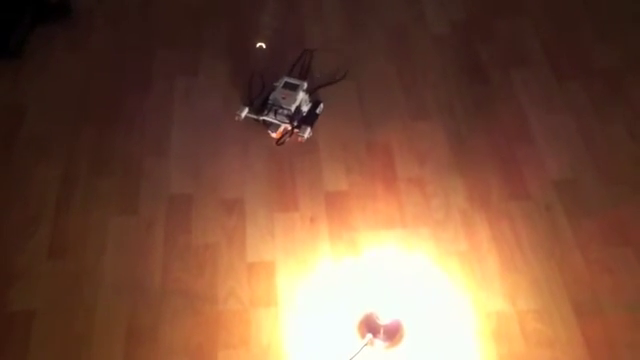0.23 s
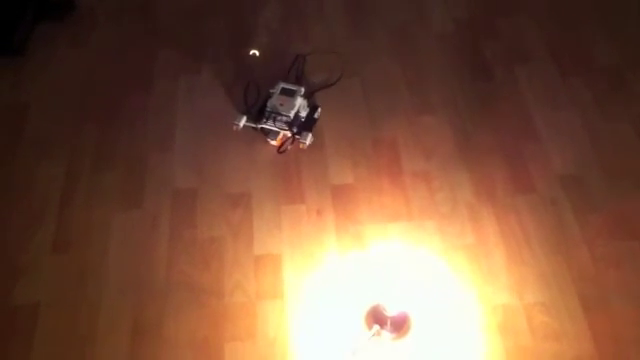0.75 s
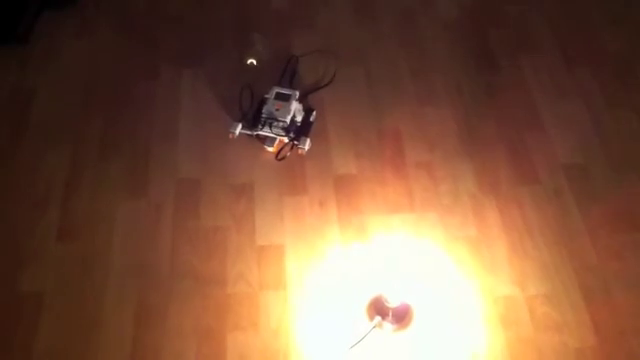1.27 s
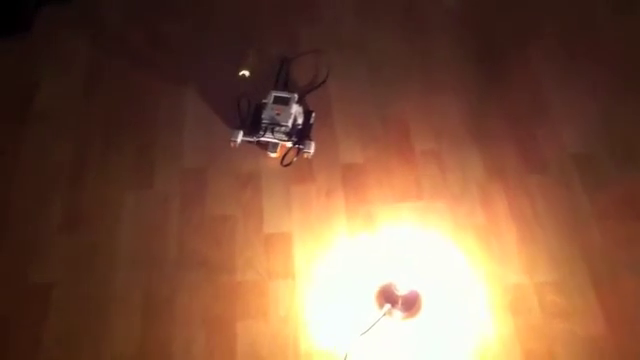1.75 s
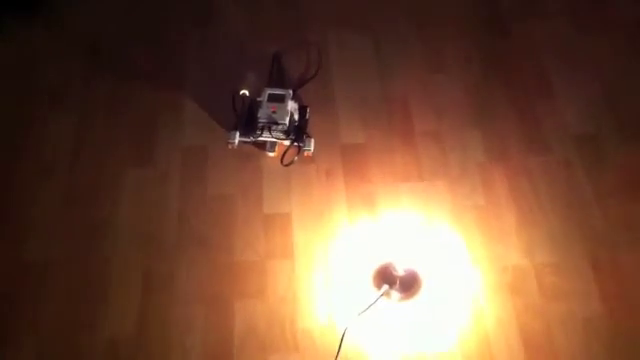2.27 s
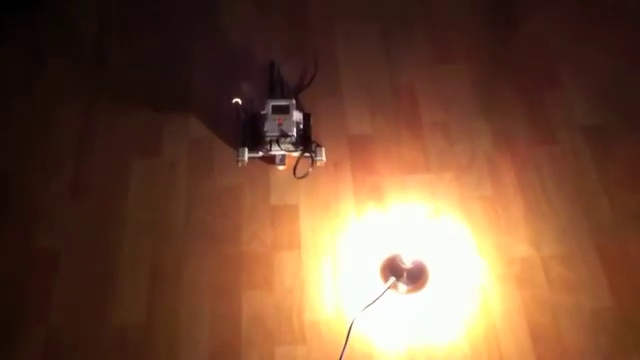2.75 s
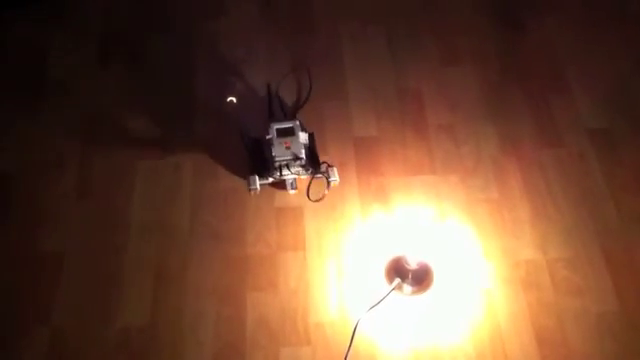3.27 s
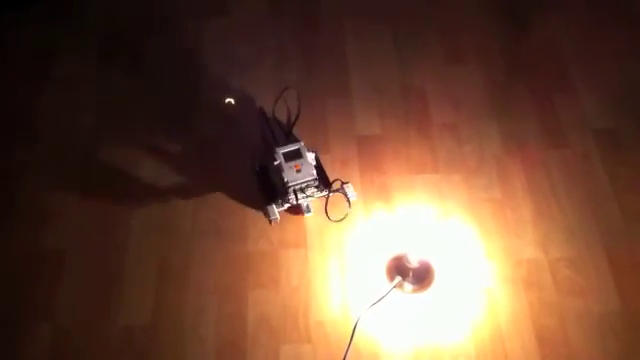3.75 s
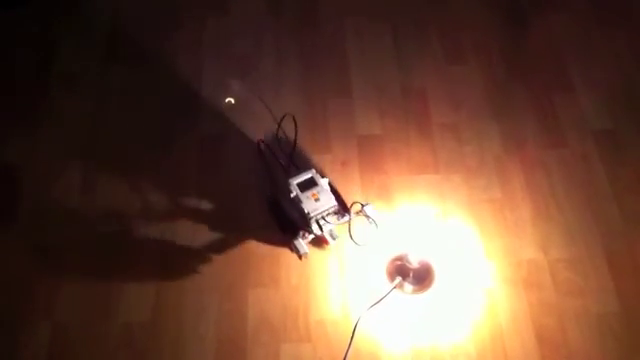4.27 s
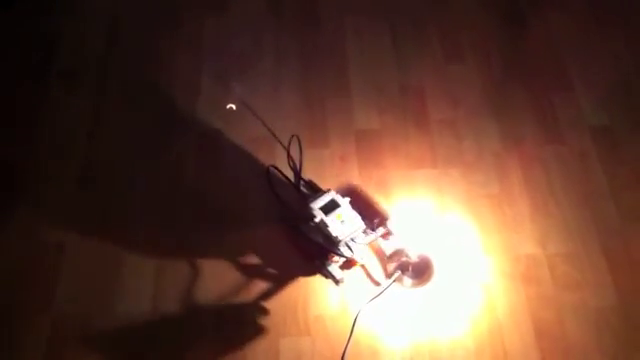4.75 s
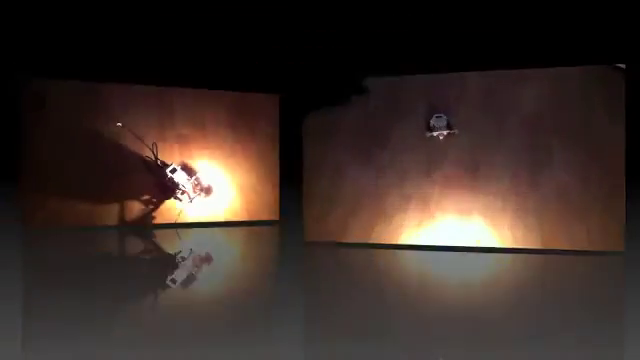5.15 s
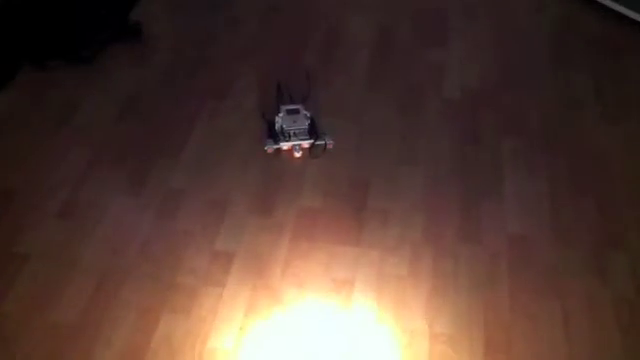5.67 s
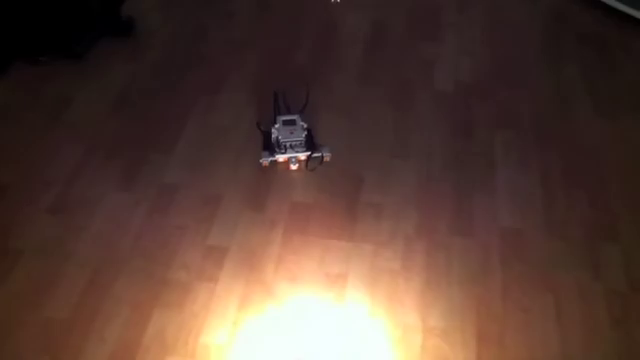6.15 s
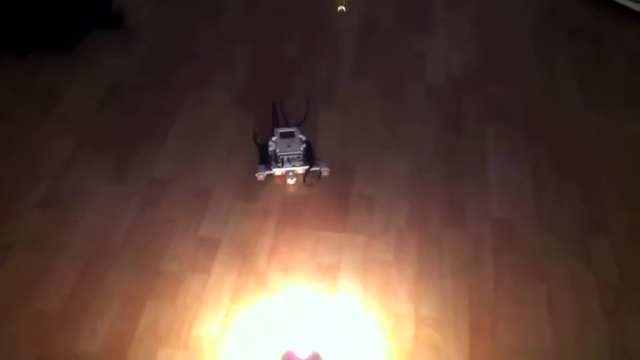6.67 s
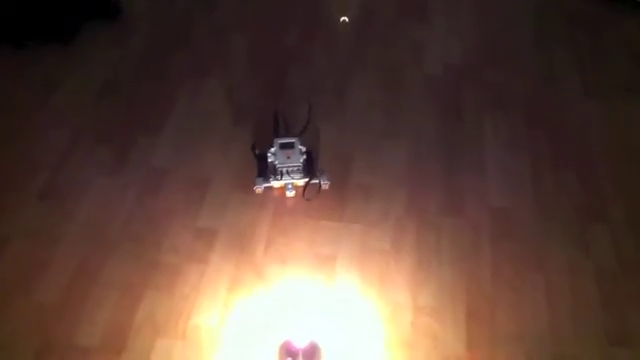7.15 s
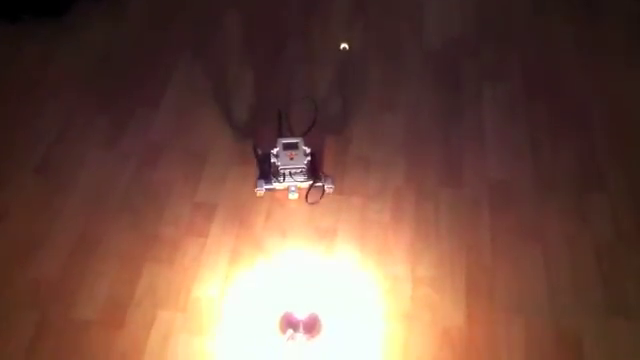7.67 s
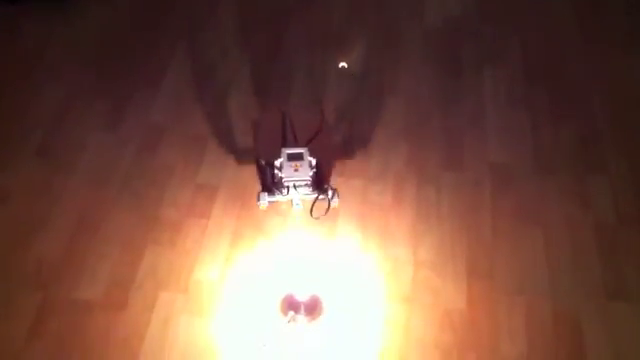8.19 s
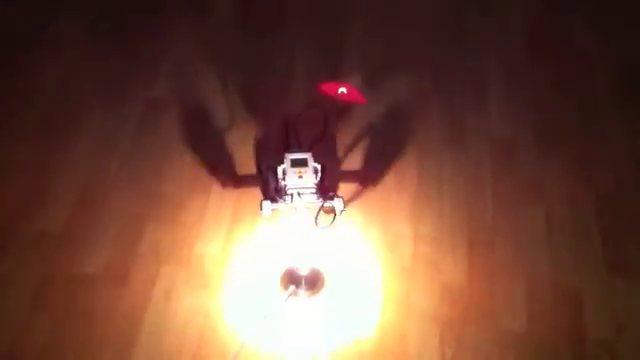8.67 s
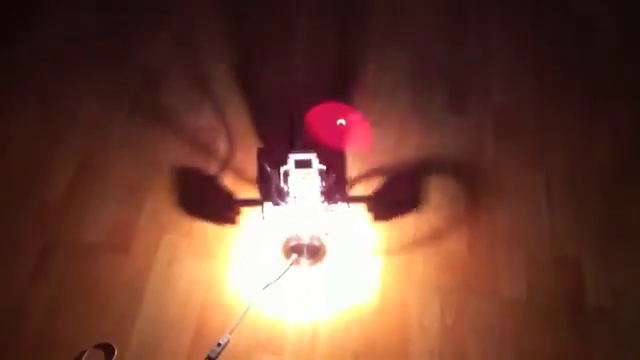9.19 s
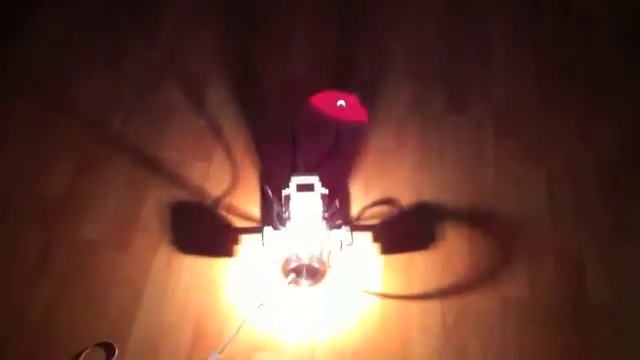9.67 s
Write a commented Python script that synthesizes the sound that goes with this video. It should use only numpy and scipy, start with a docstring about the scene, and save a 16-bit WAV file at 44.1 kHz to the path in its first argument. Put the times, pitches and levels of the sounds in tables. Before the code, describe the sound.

A small plastic robot drives over a wooden living-room floor, heard in mono with short room reflections. From 0 s a geared motor gives a thin, nasal, buzzing whine, trembling and pulsing, with dry gear rasp, fine hiss and faint wheel rumble. Light tyre thumps come near 0.2, 1.3 and 2 to 2.4 s, with a tiny plastic click near 2 s. The pitch climbs unevenly, most clearly from 2.5 to 4.4 s; a second, lower motor joins around 3.7 s. Brief whine surges occur near 3.9 and 4.35 s, and soft thumps cluster from 4.2 to 4.85 s. At about 5.1 s the scene cuts: a quieter, somewhat lower whine begins, with a hollow drone strongest near 5.8 s. Pitch rises until about 7.5 s, then wavers, with loose chatter. Quick dull knocks against the lamp hit at 9.4 s; the motors labour on, shakier and sinking, until 9.9 s.

```python
"""In a living room, a small plastic robot makes two drives over a wooden floor towards a lamp, first in a curve,
then, after a cut near 5.1 s, straight. Two geared motors whine with the rhythm of their meeting teeth, louder when
load drags the speed down. Noise shaped by the turning gears makes a rasp, a hiss and, in bands around the
harmonics, a chatter. Filtered noise gives the wheels' rumble and the chassis drone; clicks set ringing give
the thumps, a small tick and, near the end, the bumps into the lamp."""
import sys
import numpy as np
from scipy import signal
from scipy.fft import rfft, irfft, next_fast_len
from scipy.io import wavfile
from scipy.ndimage import uniform_filter1d

SR = 44100
rng = np.random.default_rng(int(sys.argv[2]) if len(sys.argv) > 2 else 0)


def generate_wav(signal):
    """Clip the signal to [-1, 1] and save it as 16-bit WAV at the path in sys.argv[1]."""
    frames = np.transpose(np.atleast_2d(signal))
    scaled = np.clip(frames, -1, 1) * 32767
    pcm = np.round(scaled).astype(np.int16)
    wavfile.write(sys.argv[1], SR, pcm)


N = 437913
TIME = np.arange(N) / SR   # seconds


def from_db(db):
    """Turn decibels into a gain."""
    return 10 ** (np.asarray(db) / 20)


def rms_one(x):
    """Scale a sound to unit power."""
    return x / np.sqrt(np.mean(x ** 2) + 1e-20)


def in_time(rows):
    """Draw straight lines between the rows and give each column a value at every sample."""
    seconds, *columns = np.transpose(rows)
    return [np.interp(TIME, seconds, column) for column in columns]


def at_hz(points, hz):
    """Read a level from a spectrum, on a logarithmic pitch axis."""
    knots, level = np.transpose(points)
    return np.interp(np.log(hz + 1e-3), np.log(knots), level)


def coloured(x, spectrum):
    """Give a noise the shape of a spectrum, at unit power."""
    size = next_fast_len(N)
    hz = np.arange(size // 2 + 1) * SR / size
    shaped = rfft(x, size) * from_db(at_hz(spectrum, hz))
    return rms_one(irfft(shaped, size)[:N])


def drift(rate_hz):
    """A smooth random wander with spread 1; a higher rate wanders faster."""
    step = 40   # samples between two computed points
    r = np.exp(-2 * np.pi * rate_hz * step / SR)
    noise = rng.standard_normal(N // step + 2002)
    slow = signal.lfilter([1], [1, -2 * r, r * r], noise)[2000:]   # drop the start-up
    return np.interp(np.arange(N) / step, np.arange(len(slow)), rms_one(slow))


def swell(s, length):
    """A smooth rise and fall of height 1 around a moment; its length lies between the 37 % points."""
    return np.exp(-(2 * (TIME - s) / length) ** 2)


def resonate(x, hz, width_hz):
    """Send a noise through one resonance, at unit power."""
    r = np.exp(-np.pi * width_hz / SR)
    return rms_one(signal.lfilter([1, 0, -1], [1, -2 * r * np.cos(2 * np.pi * hz / SR), r * r], x))


def ring(clicks, hz, t60):
    """Each unit click starts a sine of height 1 that fades by 60 dB in t60 seconds."""
    r = from_db(-60 / (t60 * SR))
    w = 2 * np.pi * hz / SR
    return signal.lfilter([0, np.sin(w)], [1, -2 * r * np.cos(w), r * r], clicks + 1e-18)


def knock(hits, modes):
    """Dull blows: the contact is soft and the light frame radiates little bass."""
    clicks = np.zeros(N)
    for s, db in hits:
        clicks[round(s * SR)] = from_db(db)
    body = sum(from_db(db) * ring(clicks, hz, t60) for hz, db, t60 in modes)
    return signal.sosfilt(signal.butter(2, [280, 640], "band", fs=SR, output="sos"), body)


def room(x, t60, wet_db, count=14):
    """Direct sound plus a dense tail from the walls, which differs from place to place along the way."""
    t = TIME[:SR // 2]
    hop = N // count + 1
    padded = np.pad(x, (hop, 2 * hop))
    walls = np.zeros(N + 3 * hop + len(t))
    fade = np.sin(np.pi * np.arange(2 * hop) / (2 * hop))
    # overlapping stretches of sound, each with its own random tail
    for start in range(0, N + hop, hop):
        tail = rng.standard_normal(len(t)) * from_db(-60 * t / t60) * (t > .004)
        part = padded[start:start + 2 * hop] * fade
        echo = signal.fftconvolve(part, tail / np.sqrt(np.sum(tail ** 2)))
        walls[start:start + len(echo)] += echo
    wet = from_db(wet_db)
    return (x + wet * walls[hop:hop + N]) / np.hypot(1, wet)


def gear_ratio(multiple):
    """Tooth counts lock every partial to whole thirds of the mesh rate."""
    return np.round(multiple * 3) / 3


# the load averages the speed over some seconds, and levels off at a largest sag
SPEED_MEMORY_S, MAX_SAG_PERCENT = 0.68, 3.5


def load(mesh_hz):
    """Per cent by which the speed sags under its running mean; negative when the motor runs free."""
    usual_hz = uniform_filter1d(mesh_hz, max(1, int(SPEED_MEMORY_S * SR)), mode="nearest")
    sag = 100 * (1 - mesh_hz / usual_hz)
    return MAX_SAG_PERCENT * np.tanh(sag / MAX_SAG_PERCENT)


PINION_TEETH = 10
CRUISE_HZ = 950              # mesh rate at cruising speed
WHINE_DB_PER_PERCENT = 0.14  # growth of the whine with load
HUM_WAVER_DB = 3
STALL_SHAKE = 1.3            # share by which the motors shake more once they push against the lamp
BITE_FROM_HZ = 1850          # the bite lifts the octave above this, and all beyond it
SING_HZ, SING_HALF_WIDTH_HZ = 2960, 130      # the housing's main resonance
BEAM_FROM_HZ, BEAM_RATE_HZ = 2800, 1.7       # beaming starts here, and wanders at this rate

# How the plastic frame passes on the whine. Each row: frequency in Hz, level in dB.
FRAME = [(900, -24), (1130, -32), (1230, -22), (1355, -1.5), (1470, -3), (1650, 2.5), (1850, 2), (2010, -1),
         (2200, -1), (2400, -3.5), (2700, -1.5), (2930, -0.5), (3100, -1.5), (3300, -3), (3700, -3.5),
         (4100, -2.5), (4550, -4), (5000, -8.5), (5400, -18), (7000, -20)]
# How strongly a harmonic sings out at the main resonance. Each row: time in seconds, boost in dB.
SINGING = [(0, 3), (.3, 0), (.9, 2), (1.12, 8.5), (1.35, 9), (1.6, 1), (1.9, 4), (2.3, 1), (2.65, 6),
           (2.82, 11), (2.96, 5), (3.4, 0), (3.86, 0), (3.97, 7.5), (4.12, 3), (4.35, -1), (4.45, 7),
           (4.9, 4), (5.2, 0), (7.7, -1), (8.28, -6), (8.55, -1), (8.72, -5), (9.1, -1), (9.35, -3),
           (9.6, -3)]
# Partials of the tooth force; 1.33 is a gear with its own tooth count.
# Each row: multiple of the mesh rate, level in dB at cruising speed, growth in dB per octave of speed.
PARTIALS = [(1.33, -13.5, 5), (2, 0, 6), (3, -0.5, 1), (4, 0, 3), (5, -7, -12), (6, -3, -4), (7, -6, -4),
            (8, -11, -5)]


def motor(speed, teeth, hums, hunting, flutter, runout, uneven_db, patchy_db):
    """Harmonics of the tooth mesh, swelling as they cross the frame's resonances; also the mesh angle."""
    mesh_hz, = in_time(speed)
    force_db, bite_db = in_time(teeth)
    sing_db, = in_time(SINGING)
    force_db = force_db + WHINE_DB_PER_PERCENT * load(mesh_hz)
    speed_octaves = np.log2(mesh_hz / CRUISE_HZ)
    shake = 1 + STALL_SHAKE * (TIME > BUMPS[0][0])

    # the speed hunts slowly, and play between the teeth shakes it quickly
    unsteady = 1 + hunting * drift(9.05) + shake * flutter * drift(67.2)
    angle = 2 * np.pi * np.cumsum(mesh_hz * unsteady) / SR
    rotor = angle / PINION_TEETH
    # an off-centre pinion advances and delays its teeth once a turn: sidebands
    angle = angle + shake * runout * np.sin(rotor) * (1 + .5 * drift(7.0))

    hum = 0
    for s, length, db, multiple in hums:
        hum = hum + from_db(db) * swell(s, length) * np.sin(gear_ratio(multiple) * angle)
    whine = hum * from_db(HUM_WAVER_DB * drift(18)) * np.sqrt(2)

    for multiple, db, speed_db in PARTIALS:
        k = gear_ratio(multiple)
        hz = k * mesh_hz
        # a harder bite shifts weight to the upper harmonics, as far as the soft plastic allows
        tilt_db = bite_db * np.clip(np.log2(hz / BITE_FROM_HZ), 0, 1)
        singing_db = sing_db / (1 + ((hz - SING_HZ) / SING_HALF_WIDTH_HZ) ** 2)
        body_db = at_hz(FRAME, hz) + singing_db
        wobble_db = uneven_db * (drift(27.0) + 0.4 * np.sin(rotor + rng.uniform(0, 2 * np.pi)))
        # short waves are beamed, so the highest partials come and go as the robot moves
        beam_db = patchy_db * drift(BEAM_RATE_HZ) * np.clip(hz / BEAM_FROM_HZ - 1, 0, 1)
        level_db = force_db + db + speed_db * speed_octaves + tilt_db + body_db + wobble_db + beam_db
        whine = whine + from_db(level_db) * np.sqrt(2) * np.sin(k * angle)

    # a 23 ms fade-in, ending at the first row of the speed table
    fade_in = np.clip((TIME - speed[0][0]) / 0.023 + 1, 0, 1)
    return whine * fade_in, angle


def throb(angle, strength, teeth_per_turn):
    """A slow gear further down the train loads the motor once a turn, so the whine pulses."""
    depth_db = strength * (-0.24 + 0.3 * drift(0.53))
    return from_db(depth_db * np.sin(angle / teeth_per_turn + 1.3 * drift(4.7)))


# Speed of the louder motor. Each row: time in seconds, tooth-mesh rate in Hz.
LEAD_SPEED = [(0, 572.5), (.1, 555), (.32, 584), (.58, 532.7), (.78, 588), (1.12, 603), (1.3, 606),
              (1.56, 673.4), (1.8, 604), (2.14, 664), (2.55, 723), (2.72, 735), (2.88, 730.5), (3.3, 813),
              (3.58, 928), (3.75, 875), (3.81, 923), (3.89, 925.5), (3.97, 966), (4.35, 999), (4.5, 972),
              (4.8, 966), (5.02, 968), (5.18, 825), (5.7, 821), (5.95, 854), (6.17, 826), (6.4, 892),
              (6.6, 924), (7.03, 930), (7.2, 977.4), (7.48, 1009), (7.72, 951), (8.05, 1027), (8.3, 1011),
              (8.55, 993), (8.72, 1026), (8.9, 1021), (9.1, 967), (9.27, 952), (9.38, 987), (9.55, 917),
              (9.7, 914), (9.93, 870)]
# How its teeth engage. Each row: time in seconds, tooth force in dB, bite (lift of the upper harmonics) in dB.
LEAD_TEETH = [(0, -57.5, 4), (.32, -57.5, -7), (.52, -57, 4), (.7, -59.5, 2), (.9, -56.5, 4.5),
              (1.3, -52, -5.5), (1.42, -54, -2), (1.56, -60, 0), (1.68, -52, -2), (1.8, -49, -7),
              (1.93, -61.5, 7), (2.2, -53.5, -1.5), (2.55, -52, -4), (2.8, -55, 3), (3.1, -56.5, 4.5),
              (3.3, -52.5, 2), (3.58, -50, -8), (3.73, -55.5, -2), (3.86, -42.5, -13), (3.97, -53, -3),
              (4.22, -50.5, -4.5), (4.3, -56, -1), (4.355, -41, -8), (4.4, -56.5, 5.5), (4.55, -57, -1),
              (4.73, -51.5, -2), (4.829, -46.5, -5), (4.93, -55, 4), (4.99, -49, -5), (5.1, -50, -6),
              (5.28, -64, 3), (5.45, -65, 0), (5.53, -58, -2), (5.72, -57, 0), (5.82, -69, 3),
              (6.15, -55, -1), (6.46, -58, 0), (6.75, -56, -2), (7.03, -58, 10), (7.25, -59, 0),
              (7.5, -58, 0), (7.7, -52.5, -4), (8.05, -56.5, -11), (8.28, -48, -3), (8.55, -52, -3),
              (8.72, -54, -11), (8.92, -57, -6), (9.1, -52, -3), (9.35, -57, 1), (9.62, -56, 8),
              (9.8, -55, 2), (9.93, -54, -1)]
# One partial surfaces for a moment as a hum.
# Each row: middle in seconds, length in seconds, level in dB, multiple of the mesh rate.
LEAD_HUM = [(2.25, 0.22, -58, 2), (5.549, 0.09, -61, 2), (5.71, 0.081, -60, 2), (6.46, 0.1, -60, 4),
            (5.897, 0.32, -67, 1), (6.329, 0.2, -70, 1), (7.176, 0.16, -64, 1), (7.22, 0.25, -58, 1.33),
            (7.448, 0.31, -66, 1), (7.66, 0.24, -60, 1.33), (7.86, .16, -60, 1), (8.45, 0.81, -66.5, 1),
            (9.176, 0.33, -59, 1), (9.6, 0.17, -62, 1), (9.881, 0.31, -63, 1)]


def lead_motor():
    """The louder motor: its tooth whine pulses with a slow gear; also the mesh angle."""
    whine, angle = motor(LEAD_SPEED, LEAD_TEETH, LEAD_HUM, hunting=0.0045, flutter=0.00586,
                         runout=0.079, uneven_db=3.0, patchy_db=-1.0)
    return whine * throb(angle, strength=3.0, teeth_per_turn=77), angle


# noise levels at cruising speed, and their growth with speed
RASP_DB, RASP_DB_PER_OCTAVE = -45.5, 4.5
HISS_DB, HISS_DB_PER_OCTAVE = -47, 6

# Tone of the rasp. Each row: frequency in Hz, level in dB per Hz.
RASP_COLOUR = [(470, -54), (800, -19.5), (1050, -12), (1200, -4.5), (1340, -3.5), (1560, -5), (1990, 1),
               (2630, 1.5), (2920, 2), (3360, 0), (3850, 1), (4220, -4), (5000, -8), (6500, -59),
               (11000, -120)]
# Tone of the hiss. Each row: frequency in Hz, level in dB per Hz.
HISS_COLOUR = [(2710, -34), (4600, -3.5), (5470, -4), (6320, 1), (9320, -7), (10700, -5), (12400, -8),
               (14400, -8), (15100, -9.5), (15600, -13)]
# Housing resonances rung by the rasp. Each row: frequency in Hz, width in Hz, level in dB.
HOUSING = [(1344, 130, -23), (1880, 510, -33), (2940, 69, -10), (3815, 190, -14), (6340, 150, -16.5)]
# The gear trains bind (+) or run slack (-) for a moment.
# Each row: middle in seconds, length in seconds, change of rasp in dB, change of hiss in dB.
BINDS = [(1.049, 0.75, 2, 1.5), (1.524, 0.26, 0, -2.5), (3.522, 0.12, -4, -3.5), (3.9, 0.41, 1.5, 0.5),
         (4.86, 0.17, 1, 2), (5.353, 0.7, -1, -2), (5.95, 1, 1, 1.5), (6.388, 0.14, -3, -1.5),
         (7.679, 0.25, 0.5, 1.5), (8.25, 0.44, 0, 0.9), (9.8, 0.33, 2, 1.3)]


def gears(mesh_hz, angle, pulsing, ticks_per_s, tick_size, flicker_db):
    """Teeth scrape with the mesh, louder with speed or binding; many small ticks as they snap across their play."""
    octaves = np.log2(mesh_hz / CRUISE_HZ)
    rasp_bind_db, hiss_bind_db = sum(np.outer(dbs, swell(s, length)) for s, length, *dbs in BINDS)
    rasp_db = RASP_DB + RASP_DB_PER_OCTAVE * octaves + rasp_bind_db
    hiss_db = HISS_DB + HISS_DB_PER_OCTAVE * octaves + hiss_bind_db

    mesh_pulse = 1 + pulsing * np.cos(angle)
    scrape = rng.standard_normal((2, N)) * mesh_pulse * from_db(flicker_db * drift(33))
    ticks = (rng.random(N) < ticks_per_s / SR) * rng.uniform(-1.74, 1, N) * tick_size
    coarse, fine = scrape + ticks

    housing = 0
    for hz, width_hz, db in HOUSING:
        housing = housing + from_db(db) * resonate(rng.standard_normal(N) + ticks, hz, width_hz)
    rasp = from_db(rasp_db) * (from_db(-2.5) * coloured(coarse, RASP_COLOUR) + housing)
    hiss = from_db(hiss_db) * coloured(fine, HISS_COLOUR)
    return rasp + hiss


# Loudness of the wheels on the boards. Each row: time in seconds, level in dB.
ROLLING = [(0, -70.5), (2.2, -69), (3.8, -68), (4.7, -67), (5.1, -67.5), (7.2, -67), (9.3, -64),
           (9.93, -69.5)]
# Tone of the rumble. Each row: frequency in Hz, level in dB per Hz.
ROLLING_COLOUR = [(15, -60), (25, -9), (32, -39), (76, -27.5), (198, -10.5), (244, -12.5), (395, -6.5),
                  (425, 1.5), (452, -6), (487, 1), (565, -6.5), (619, -7.5), (900, -7), (1170, -27),
                  (1980, -120)]


def rolling(lumpy_db):
    """Wheels rumble over the boards: coloured noise of uneven strength."""
    level_db, = in_time(ROLLING)
    lumps = rng.standard_normal(N) * from_db(lumpy_db * drift(15.5))
    return from_db(level_db) * coloured(lumps, ROLLING_COLOUR)


# The tyres thump on the boards. Each row: time in seconds, strength of the blow in dB.
THUMPS = [(0.184, -58), (0.246, -68), (0.385, -65), (1.154, -61), (1.195, -61), (1.284, -55), (1.325, -54),
          (1.364, -64), (1.849, -58), (2.046, -57), (2.206, -54), (2.392, -53), (4.203, -51), (4.274, -55),
          (4.401, -55), (4.51, -53), (4.618, -53), (4.67, -51), (4.72, -50), (4.774, -46), (4.847, -50.5)]
# What a thump rings with. Each row: frequency in Hz, level in dB before the knock filter, 60 dB fade in seconds.
THUMP_MODES = [(420, -19.5, 0.073), (493, -6.5, 0.15), (556, -10, 0.057), (660, -5.5, 0.088)]


def tyre_thumps():
    """Tyres hit the boards and set a few short modes ringing."""
    return knock(THUMPS, THUMP_MODES)


# The chatter lies in bands around the upper harmonics.
# Each row: multiple of the mesh rate, level in dB at cruising speed, growth in dB per octave of speed.
CHATTER = [(3, -6, -3), (4, -1.5, -7), (5, -1.5, 28), (6, -5, 10), (7, -9, 1)]
# How loosely the teeth run. Each row: time in seconds, chatter level in dB.
LOOSENESS = [(0, -90), (2, -62), (2.8, -56.5), (5.3, -71), (6.1, -56.5), (7.7, -56.5), (8.4, -56.5),
             (9.2, -55.5), (9.93, -59)]


def chatter(mesh_hz, angle, spread_hz, patchy_db):
    """Teeth that land early or late smear the upper harmonics into bands, which surface in patches."""
    octaves = np.log2(mesh_hz / CRUISE_HZ)
    bands = 0
    for multiple, db, speed_db in CHATTER:
        turn = round(multiple) * angle
        gain = from_db(db + speed_db * octaves + patchy_db * drift(BEAM_RATE_HZ))
        bands = bands + gain * (drift(spread_hz) * np.cos(turn) + drift(spread_hz) * np.sin(turn))
    return bands * from_db(in_time(LOOSENESS)[0])


# A loose plastic part clicks. Each row: time in seconds, level in dB, frequency in Hz, 60 dB fade in seconds.
TICKS = [(1.961, -51, 935, .03)]


def tick():
    """A loose plastic part clicks and rings briefly."""
    return sum(from_db(db) * ring(np.arange(N) == round(s * SR), hz, t60) for s, db, hz, t60 in TICKS)


# Speed of the other motor, which fades in at 3.68 s and then speeds up.
# Each row: time in seconds, tooth-mesh rate in Hz.
SECOND_SPEED = [(3.68, 557), (3.8, 599), (3.95, 634.5), (4.3, 660), (5.05, 632), (5.3, 772), (5.55, 792.5),
                (5.9, 786.5), (6.15, 804), (6.4, 846.3), (7.03, 854.5), (7.3, 987), (7.58, 925.4),
                (7.85, 963.5), (8.25, 995), (8.55, 969), (9.2, 952.5), (9.43, 947), (9.56, 814),
                (9.93, 764)]
# How its teeth engage. Each row: time in seconds, tooth force in dB, bite (lift of the upper harmonics) in dB.
SECOND_TEETH = [(3.68, -57, -1), (3.9, -62, 2), (4.1, -58, 1), (4.5, -77, 2), (5.35, -60, 2), (5.7, -63, 4),
                (5.88, -56, -1), (6.2, -59, -3), (6.6, -65.5, 1), (7.03, -59, -2), (7.3, -77, -3),
                (7.65, -52.5, 1), (8.0, -71, -4), (8.5, -61, 0), (8.8, -62, -7), (9.1, -59.5, -5),
                (9.6, -55.5, 1), (9.93, -59, -11)]
# One partial surfaces for a moment as a hum.
# Each row: middle in seconds, length in seconds, level in dB, multiple of the mesh rate.
SECOND_HUM = [(3.88, 0.17, -54, 2), (5.41, 0.31, -70.5, 1)]


def second_motor():
    """The other motor fades in later, with its own tooth whine and slow pulse."""
    whine, angle = motor(SECOND_SPEED, SECOND_TEETH, SECOND_HUM, hunting=0.003516, flutter=0.0055,
                         runout=0.083, uneven_db=4.0, patchy_db=7.0)
    return whine * throb(angle, strength=2.0, teeth_per_turn=81)


# The two chassis modes. Each row: frequency in Hz, width in Hz.
CHASSIS = [(500, 21), (628, 72)]
# The chassis drones while running straight.
# Each row: time in seconds, lower mode in dB, upper mode in dB.
DRONE = [(0, -108, -85), (4.4, -82, -71), (5.3, -69.5, -74), (5.72, -66, -72), (5.79, -56.5, -67),
         (5.95, -64, -67), (6.9, -63.5, -68.5), (7.5, -82, -64), (8.7, -73, -69.5), (9.15, -61, -67.5),
         (9.7, -79, -73)]


def chassis_drone():
    """Rolling sets the chassis droning: noise passed through two resonances in a row for each mode."""
    out = 0
    for (hz, width_hz), drone_db in zip(CHASSIS, in_time(DRONE)):
        narrow = resonate(rng.standard_normal(N), hz, width_hz)
        out = out + from_db(drone_db) * resonate(narrow, hz, 137)
    return out


# Knocks against the lamp. Each row: time in seconds, strength of the blow in dB.
BUMPS = [(9.379, -54), (9.400, -37.5), (9.419, -36), (9.432, -61), (9.464, -47.5)]
# What a knock rings with. Each row: frequency in Hz, level in dB before the knock filter, 60 dB fade in seconds.
BUMP_MODES = [(154, -8, 0.16), (400, -15, 0.4), (451, 0, 0.12), (525, -9.5, 0.16), (1347, -24, .06)]


def lamp_bumps():
    """The robot bumps into the lamp, and each blow sets its modes ringing."""
    return knock(BUMPS, BUMP_MODES)


def scene():
    """The robot in a living room, heard in mono."""
    mesh_hz, = in_time(LEAD_SPEED)
    lead, angle = lead_motor()
    whine = room(lead + second_motor(), t60=0.23, wet_db=-2.5)
    scraping = gears(mesh_hz, angle, pulsing=0.13, ticks_per_s=55, tick_size=4.3, flicker_db=.5)
    loose_teeth = chatter(mesh_hz, angle, spread_hz=133, patchy_db=2.5)
    rasp = room(scraping + loose_teeth, t60=0.097, wet_db=-7.0)
    wheels = rolling(lumpy_db=2.0) + tyre_thumps() + chassis_drone()
    knocks = room(tick() + lamp_bumps(), t60=.25, wet_db=-13)
    mono = whine + rasp + wheels + knocks
    return np.array([mono, mono])


CUTOFF_HZ = 15600


def record(dry):
    """The top of the treble is cut steeply."""
    low_pass = signal.ellip(14, .1, 70, CUTOFF_HZ, fs=SR, output="sos")
    return signal.sosfilt(low_pass, dry)


dry = scene()
out = record(dry)
generate_wav(out)
```